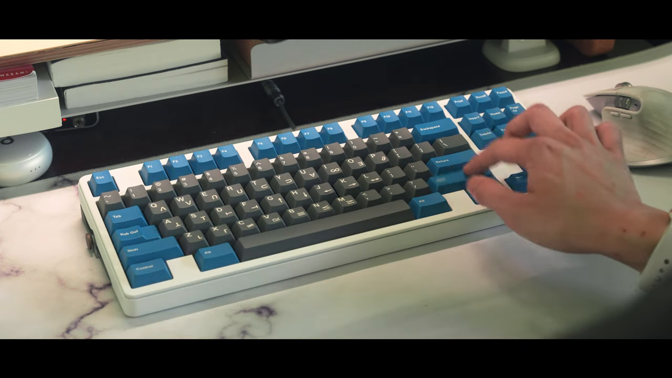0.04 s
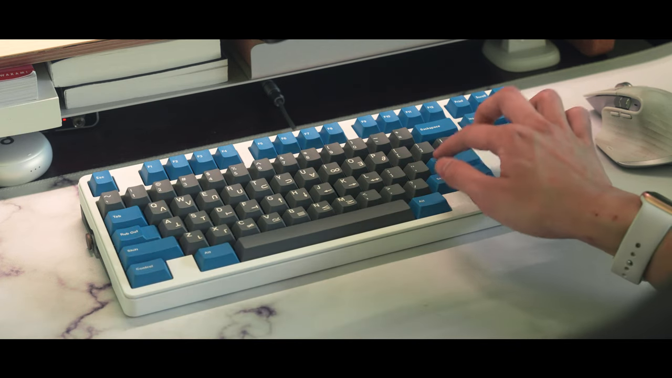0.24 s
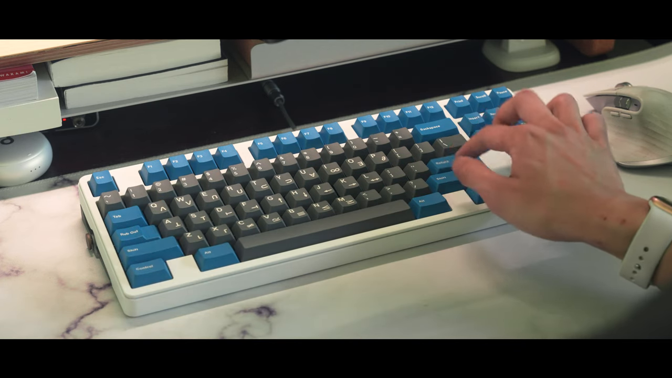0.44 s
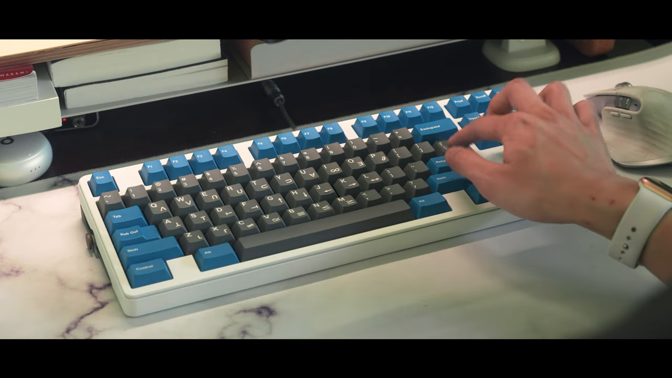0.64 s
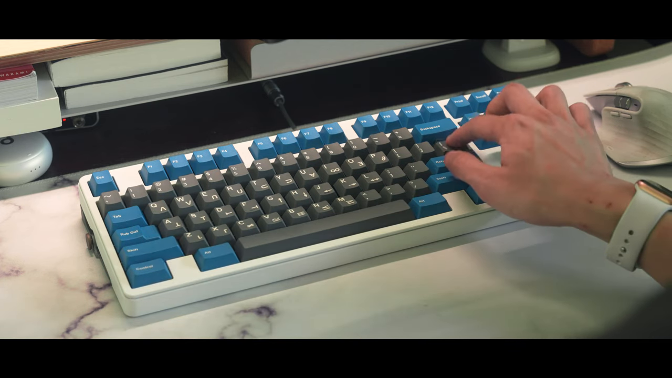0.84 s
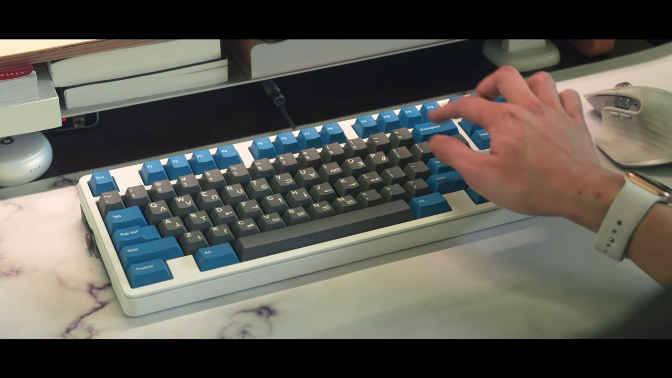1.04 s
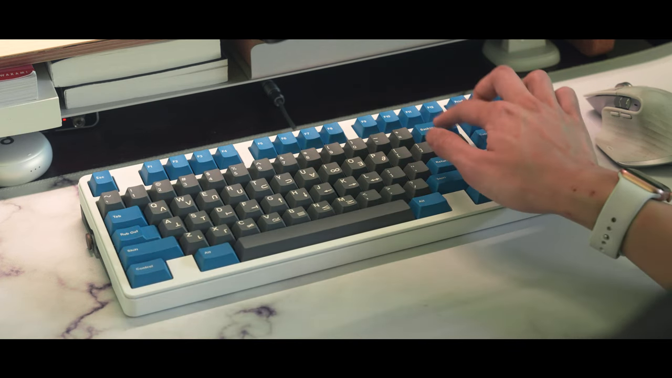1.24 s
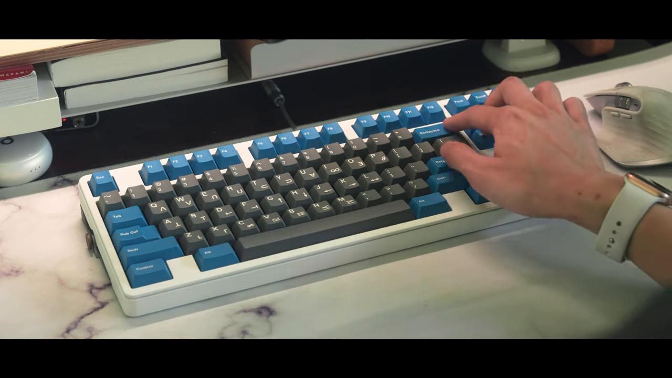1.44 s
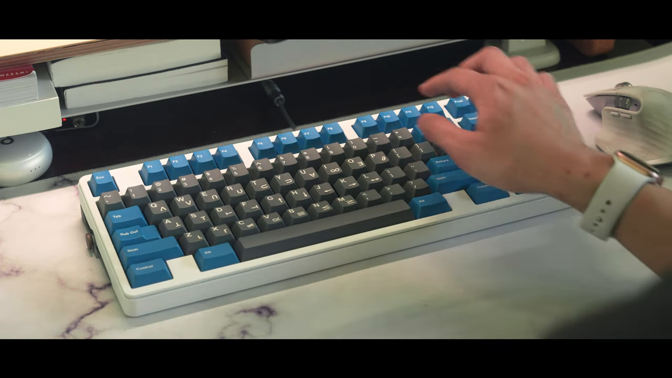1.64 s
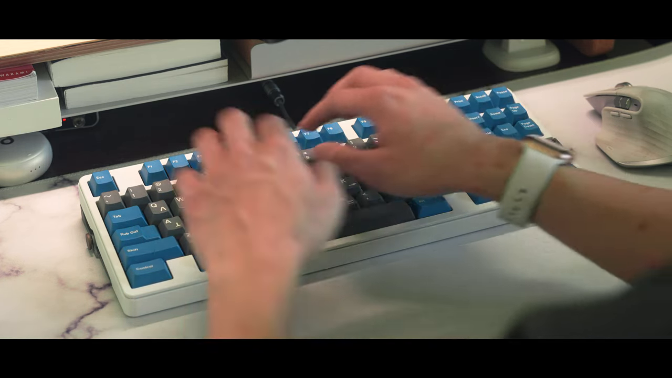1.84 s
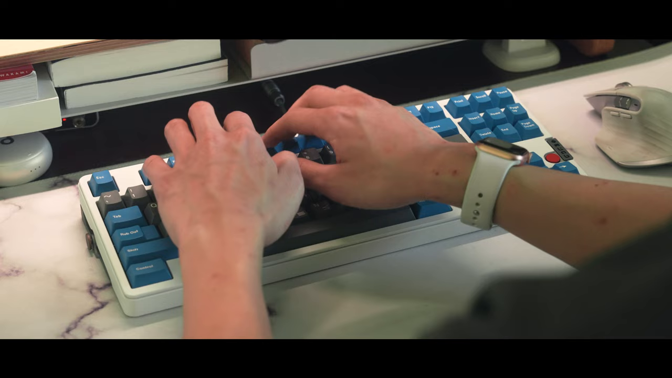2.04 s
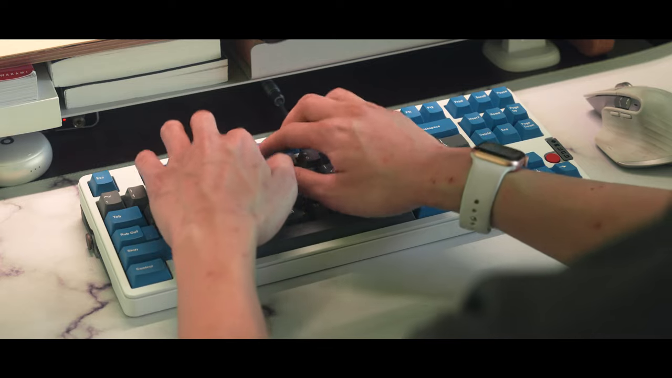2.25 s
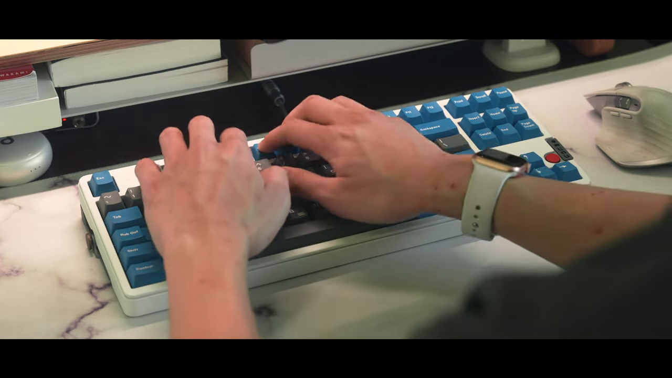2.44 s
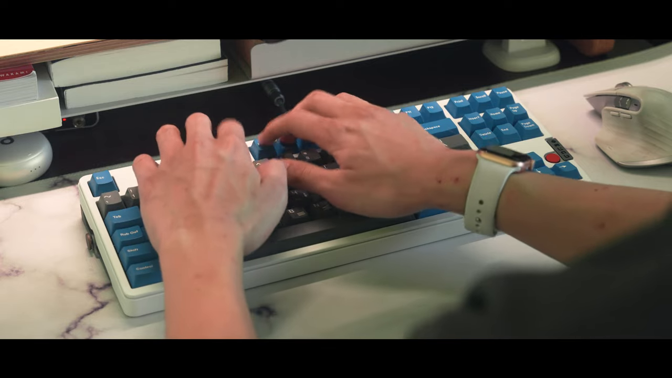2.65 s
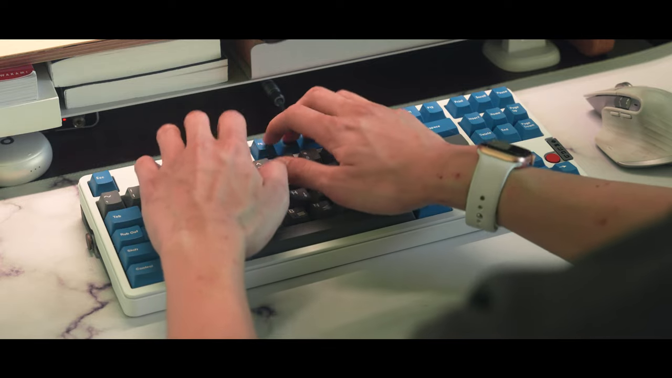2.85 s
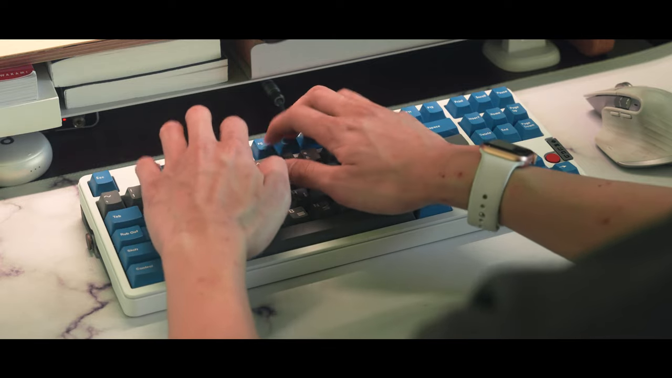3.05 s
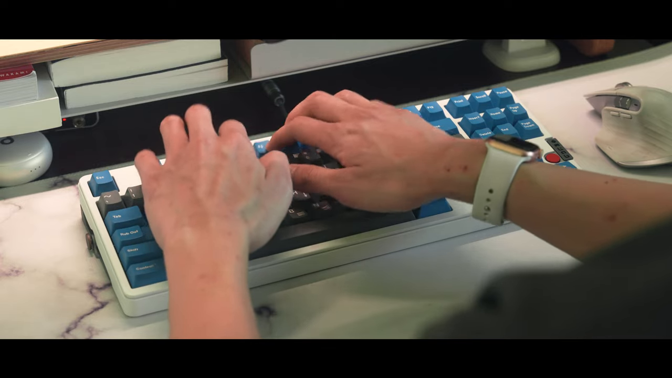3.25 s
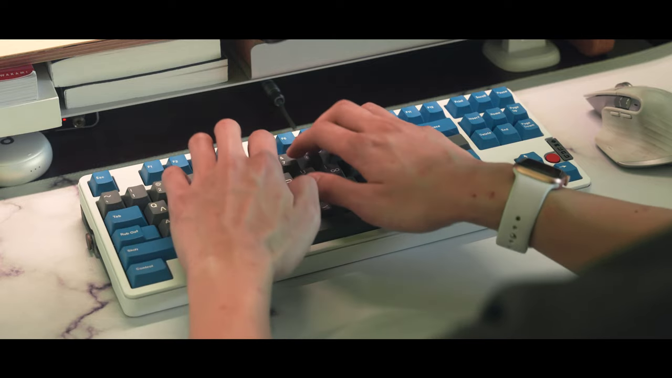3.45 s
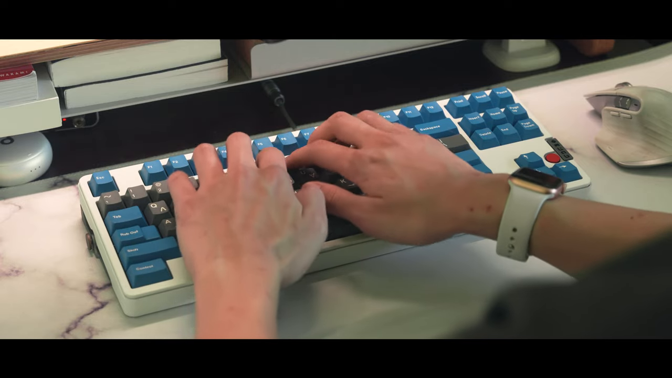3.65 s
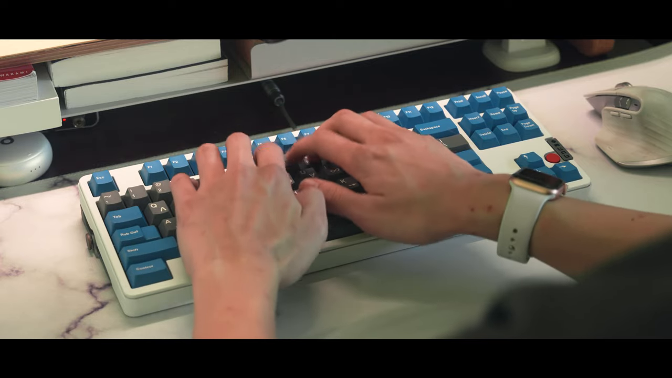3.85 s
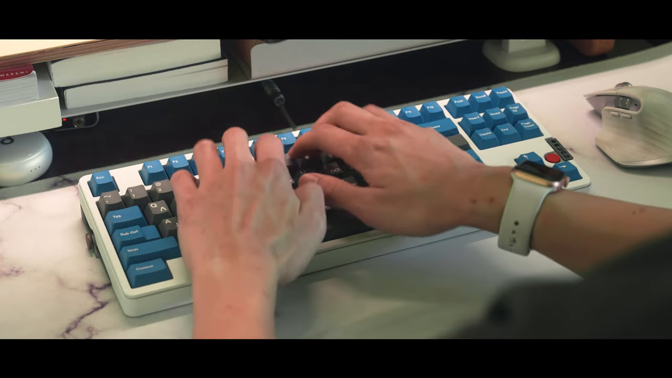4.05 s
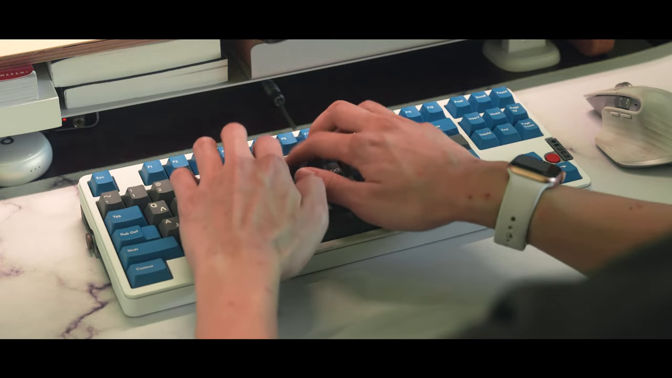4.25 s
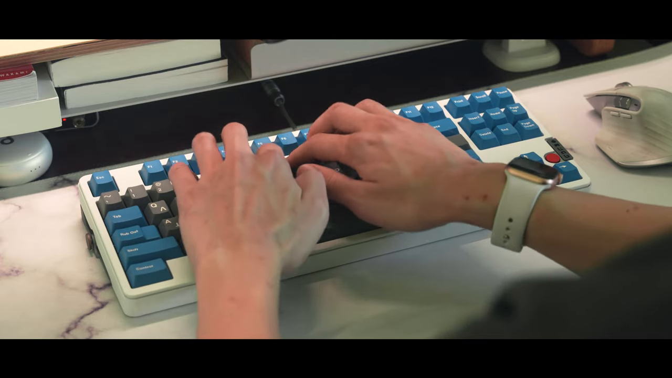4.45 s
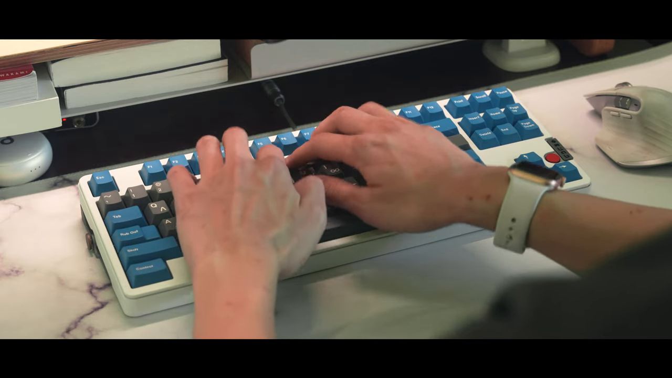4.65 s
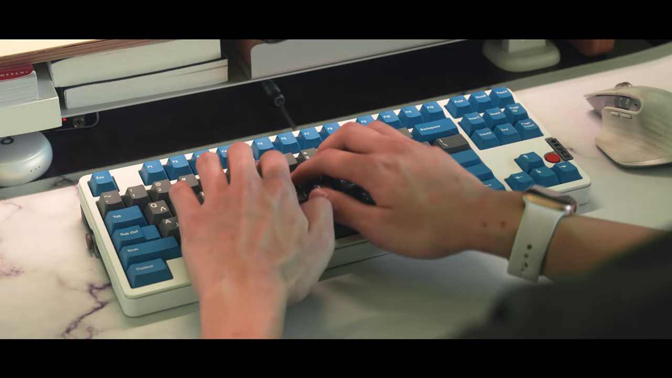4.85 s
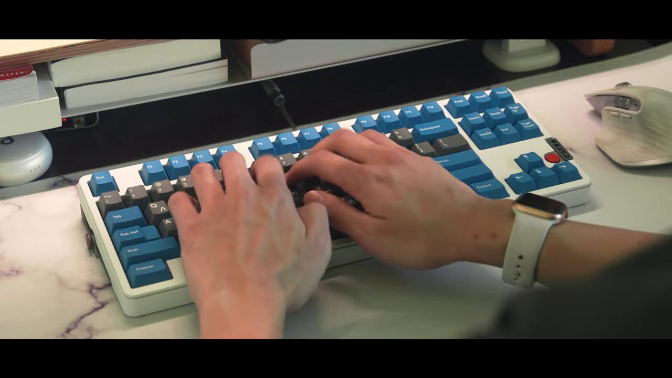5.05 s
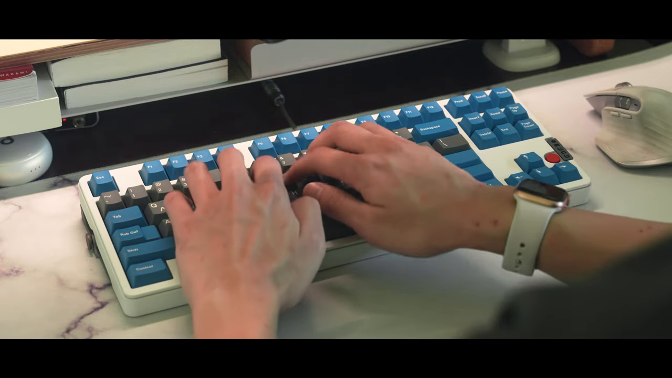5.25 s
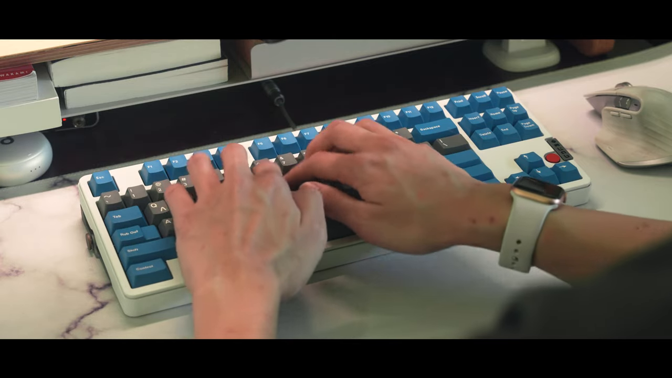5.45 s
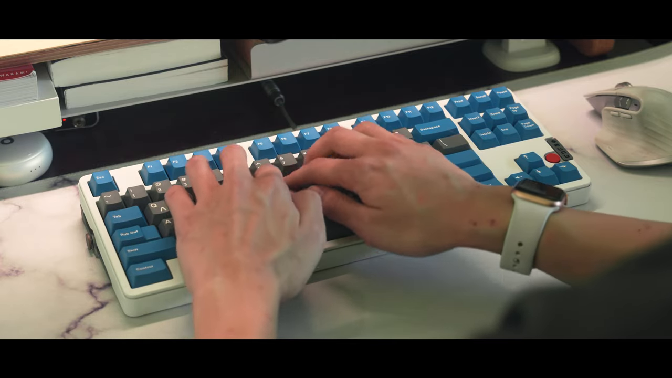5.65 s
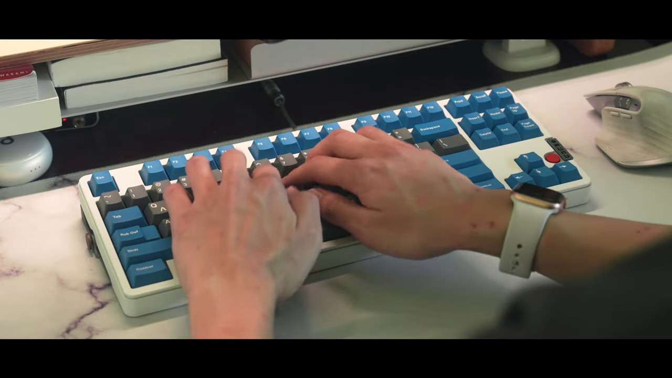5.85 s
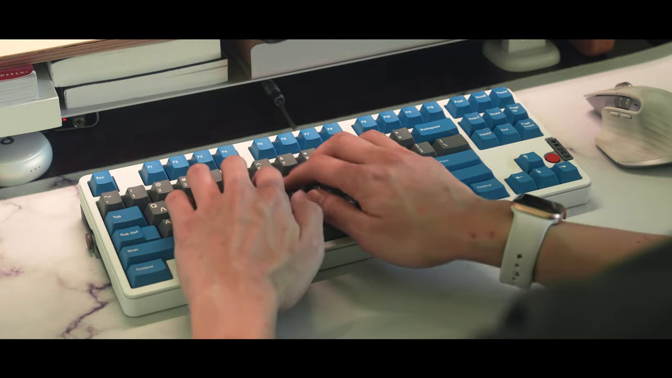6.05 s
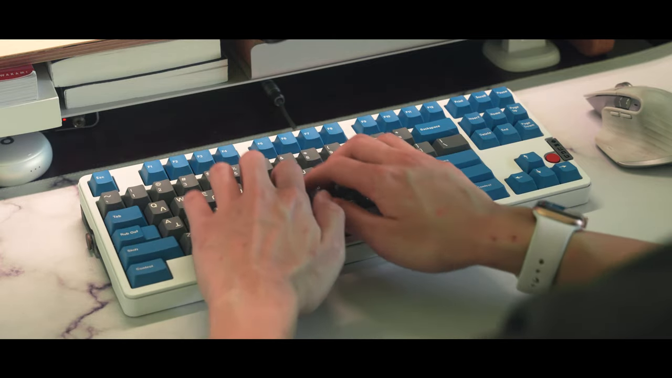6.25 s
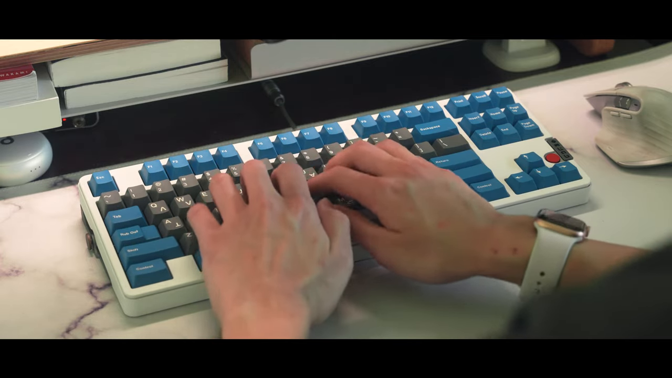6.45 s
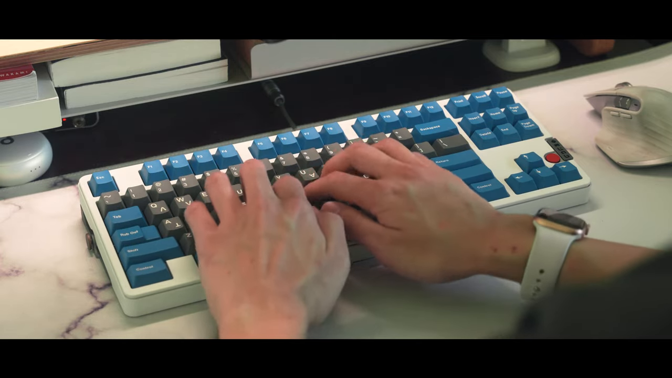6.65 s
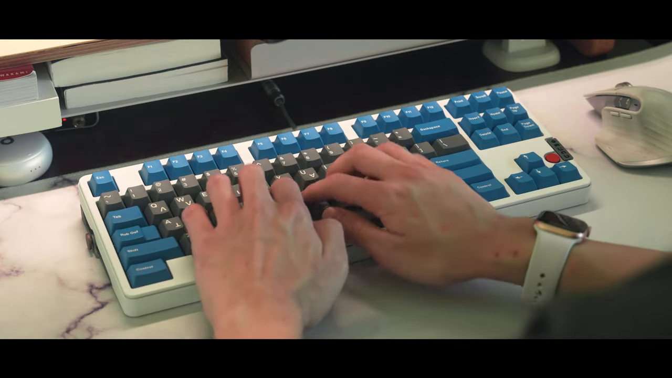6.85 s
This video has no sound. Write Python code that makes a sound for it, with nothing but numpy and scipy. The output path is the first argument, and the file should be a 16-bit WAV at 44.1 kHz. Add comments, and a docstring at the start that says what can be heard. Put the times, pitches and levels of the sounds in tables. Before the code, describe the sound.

A heavy mechanical keyboard on a desk, close to the microphone. First, one hand taps keys singly at a brisk, even pace, each a firm plastic clack with a low thock. After a half-second pause, both hands type four dense, rattling bursts with short gaps between. Light ticks and fingertip brushes fill the bursts. The small room adds only a faint tail over a low, steady hush.

```python
"""A desk in a small room: typing on a heavy mechanical keyboard, close to the microphone.
Single taps on the right-hand keys, then four quick two-handed bursts.
Each stem hitting bottom or springing back rings its keycap, snaps the switch housing and thocks the case.
Stems rub before each blow, fingertips graze caps and light contacts tick between blows.
The room answers faintly with a filtered noise tail, over a steady low hush."""
import sys
import numpy as np
from scipy import signal
from scipy.fft import rfft, irfft, next_fast_len
from scipy.io import wavfile

SR = 44100
rng = np.random.default_rng(int(sys.argv[2]) if len(sys.argv) > 2 else 0)


def file_out(sig):
    """Save sig as 16-bit WAV at sys.argv[1]."""
    # one column per channel
    cols = np.atleast_2d(sig).T
    # limit, then scale
    lim = np.clip(cols, -1, 1)
    pcm = np.round(lim * 32767).astype(np.int16)
    wavfile.write(sys.argv[1], SR, pcm)


N = 304731
SIZE = 8192  # samples per impact
AGE_S = np.arange(SIZE) / SR
FREQS_HZ = np.fft.rfftfreq(SIZE, 1 / SR)


def undb(db):
    """Decibels to gain."""
    return 10 ** (np.asarray(db) / 20)


def unit(x):
    """Scale to an energy of one."""
    return x / np.sqrt(np.sum(x ** 2))


def spectrum(points, size, scale=1):
    """Decibels at each frequency bin, with the points shifted in pitch by scale."""
    hz, db = np.transpose(points)
    bins_hz = np.fft.rfftfreq(size, 1 / SR)
    return np.interp(np.log(bins_hz + 1), np.log(hz * scale), db)


def bump(hz, width_hz):
    """A bell of height one on the frequency axis."""
    return np.exp(-((FREQS_HZ - hz) / width_hz) ** 2)


def resonate(force, db):
    """Pass a short force through a causal, minimum-phase body with the given response."""
    cepstrum = irfft(np.log(undb(db)))
    cepstrum[1:SIZE // 2] *= 2
    cepstrum[SIZE // 2 + 1:] = 0
    return irfft(rfft(force) * np.exp(rfft(cepstrum)))


def add(out, s, x):
    """Mix x in at time s."""
    start = int(np.clip(s * SR, 0, N - 1))
    out[start:start + len(x)] += x[:N - start]


# still air of the room, relative spectrum: freq_hz, level_db (per Hz)
AIR = [(60, -12), (150, -16), (230, -5.5), (300, -11), (440, -15), (600, -22), (1500, -30.5), (2100, -25),
       (2400, -30.5), (3400, -30.5), (4400, -43.5), (6200, -38), (12500, -45.5), (14000, -61)]


def hush(level_db=-71.5):
    """Steady low room noise: white noise shaped by the air spectrum."""
    air = irfft(rfft(rng.standard_normal(N)) * undb(spectrum(AIR, N)), N)
    return undb(level_db) * air / np.std(air)


# colour of each group of keys: start_s, housing_peak_hz, peak_lift_db,
# cap_overtone_hz, overtone_lift_db, antiresonance_hz, notch_depth_db
GROUPS = [(0, 5660, 1, 3890, 9.5, 1465, 6), (.68, 5900, 1, 2986, -1, 1477, 7.5),
          (1.15, 8240, 9.5, 2150, 2.5, 1646, 18.5), (2.0, 7300, -1, 4360, 5.5, 3360, 3.5),
          (3.45, 8350, 3, 2290, 3, 1500, 9), (4.85, 9890, 10, 2990, 4.5, 2190, 1.5)]


def group_at(s):
    """Index of the group of keys under the hands at time s."""
    return max(np.searchsorted(np.array(GROUPS)[:, 0], s) - 1, 0)


def contact(ring_ms, chatter, after, after_s=0.0035):
    """Force of plastic on plastic: one sharp blow, brief chatter, then a weaker shiver of the plate."""
    ring_ms = max(ring_ms, .25)
    chatter_fade = np.exp(-AGE_S * 1000 / (ring_ms * chatter))
    shiver_fade = after * np.exp(-AGE_S / after_s)
    force = unit(rng.standard_normal(SIZE) * (chatter_fade + shiver_fade))
    force[0] += 0.64 / ring_ms  # shorter contacts put more into the first blow
    return force


# plate under each group: narrow_ring_hz, ring_lift_db, struck_case_mode_hz, mode_lift_db
PLATE = [(1870, 5.5, 606, 7.5), (2950, 5.5, 1120, 2.5), (2900, 5, 520, 6), (2040, 4.5, 340, -3),
         (2870, 1.5, 1250, 3.5), (2390, 2, 1250, 1.5)]
# response of a keycap pitched at CAP_HZ: freq_hz, level_db
CAP = [(300, -50.5), (900, -38.5), (1500, -11), (1900, -4.5), (2350, -1.5), (2750, 0.5), (3400, -4.5),
       (4300, -13), (5500, -22), (9000, -41.5)]
CAP_HZ = 2700


def keycap(group, cap_hz, ring_ms):
    """Contact force through the cap response, coloured by overtone, antiresonance and plate ring."""
    _, _, _, overtone_hz, overtone_db, notch_hz, notch_db = GROUPS[group]
    plate_hz, plate_db, _, _ = PLATE[group]
    response_db = spectrum(CAP, SIZE, cap_hz / CAP_HZ)
    response_db = response_db + overtone_db * bump(overtone_hz, 0.13 * overtone_hz)
    response_db = response_db - notch_db * bump(notch_hz, 0.08 * notch_hz)
    response_db = response_db + plate_db * bump(plate_hz, width_hz=95)
    return unit(resonate(contact(ring_ms, chatter=0.75, after=0.44), response_db))


# response of the switch housing: freq_hz, level_db
HOUSING = [(2500, -27), (4400, -5), (5500, -10.5), (6200, 2), (7200, -3.5), (10300, -6.5), (11200, -12.5),
           (13000, -11), (16000, -29.5)]


def housing(group, ring_ms):
    """Bright snap: contact force through the housing, with the group's own peak."""
    _, peak_hz, peak_db, *_ = GROUPS[group]
    response_db = spectrum(HOUSING, SIZE) + peak_db * bump(peak_hz, width_hz=1100)
    return unit(resonate(contact(ring_ms, chatter=0.99, after=0.2), response_db))


# modes of plate and case: freq_hz, level_db, t60_s
CASE = [(194, -26, 0.045), (274, -17, 0.15), (318.6, -10.5, 0.11), (468.5, -10.5, 0.038),
        (545, -13.5, 0.036), (651.4, -14, 0.06), (760, -6.5, 0.03), (860, -9.5, 0.028), (1000, -2.5, 0.023),
        (1134, -6, 0.039), (1232, 0, 0.041), (1411, -3, 0.031)]


def case(group, detune=0.051, scatter_db=4.5, reach=.2, rise_s=0.0011):
    """Decaying modes; the strike position varies per key and alters the high modes most."""
    _, _, struck_hz, lift_db = PLATE[group]
    hz, db, t60_s = np.transpose(CASE)[:, :, None]
    db = db + lift_db * np.exp(-(np.log(hz / struck_hz) / reach) ** 2)
    shift, weight, side = rng.standard_normal((3, len(CASE), 1)) * hz / hz.max()
    tones = np.sin(2 * np.pi * hz * (1 + detune * shift) * AGE_S, dtype=np.float32)
    decays = np.exp(-np.log(1000) / t60_s * AGE_S, dtype=np.float32)
    gains = np.sign(side) * undb(db + scatter_db * weight)
    thock = np.sum(gains * tones * decays, axis=0)
    return unit(thock * (1 - np.exp(-AGE_S / rise_s)))


def key(s, cap_hz, snap_db, thock_db, ring_ms):
    """One impact: keycap ring, housing snap and case thock, levels relative to the cap."""
    group = group_at(s)
    cap = keycap(group, cap_hz, ring_ms)
    snap = undb(snap_db) * housing(group, ring_ms)
    thock = undb(thock_db) * case(group)
    return cap + snap + thock


# stems hitting bottom or top, and fingers landing in the pauses:
# time_s, energy_db, cap_pitch_hz, snap_db (relative to cap)
STROKES = [(0.0126, -25, 3400, 6.0), (0.0409, -7, 2320, -10.0), (0.1229, -2.0, 2060, -10.5),
           (0.2122, -15.5, 2560, -13), (0.2215, -3, 1930, -9.0), (0.2973, -10, 2070, -28),
           (0.3518, -30.0, 2820, -13), (0.3732, -6.5, 1920, -8.5), (0.4487, -14, 2010, -18),
           (0.5318, -3.5, 2020, -16), (0.6091, -14.5, 2650, 1.5), (0.702, -25, 3200, -6.5),
           (0.7157, -3.5, 2480, -11), (0.7948, -7.5, 2340.0, -9), (0.8374, -26.5, 2670, -14.0),
           (0.8643, -8.5, 2560, -13), (0.9356, -16.5, 2610.0, -4), (0.9812, -26.5, 3380, -8),
           (1.0071, -8, 2520, -13.5), (1.0702, -5.5, 2450.0, -7.5), (1.1739, -19.5, 2940, -11.0),
           (1.1872, -4.5, 2450, -16.0), (1.2531, -13, 2380, -12.5), (1.3134, -21, 3220, -1),
           (1.341, -1.5, 2560, -13.5), (1.413, -9.5, 2800, -10.0), (1.4666, -23.5, 3380, -0.5),
           (1.4932, -1.5, 2580.0, -11.5), (1.578, -14, 2860.0, -11.5), (2.1307, -26.5, 3220, -7),
           (2.1768, -12, 2500, -9.5), (2.2084, -13.5, 2700, -16), (2.2136, -16.5, 3080, -3),
           (2.2366, -16.5, 2590, -15), (2.273, -5, 3660, -16), (2.295, -19.5, 2590, 1.5),
           (2.4083, -18.5, 3130, -4.5), (2.4438, -8, 2500, -11), (2.4643, -11, 2450.0, -10.5),
           (2.5068, -8.5, 3030, -8.5), (2.6267, -18, 2930, -1), (2.6405, -17, 3020, -9),
           (2.6866, -11, 2800, -15), (2.692, -12, 2480, -16.0), (2.7087, -16, 2820, -13),
           (2.7128, -11.5, 2570.0, -10), (2.7332, -15.5, 2570, -9.5), (2.7554, -11.5, 3070, -10.0),
           (2.799, -20.5, 2750, -2), (2.8475, -18.5, 2640, -4.5), (2.871, -16.5, 3400, -16),
           (2.9087, -8, 2520, -13.5), (2.9256, -13.0, 2597, -11.5), (2.93, -12.5, 2600, -14),
           (2.9634, -19.5, 2680.0, -7), (2.9887, -16.5, 2950, -23), (3.0987, -12, 3500, -4),
           (3.1216, -11.5, 2180, -11), (3.1264, -12, 2730, -11.0), (3.168, -7.5, 2710, -11.0),
           (3.2183, -10, 2960, -8), (3.3059, -17.5, 3000.0, -2), (3.33, -17, 3625, -2.5),
           (3.4826, -50, 2960, -6), (3.5499, -30.5, 3330, -10.5), (3.5797, -39, 3100, -22),
           (3.6218, -11, 2580, -10), (3.635, -13, 2730, -18), (3.6528, -9.5, 2750.0, -9.5),
           (3.664, -11.5, 3127, -12), (3.6983, -9.5, 2760, -9), (3.703, -8.5, 2898, -11),
           (3.7523, -16, 2730, -7.5), (3.82, -13.5, 2800, -8.5), (3.8623, -8.5, 2740, -14),
           (3.8824, -5.5, 2550, -11.0), (3.9075, -5.5, 2840, -15), (3.9538, -8, 2670, -10.0),
           (3.994, -16.5, 2597, -10.5), (4.0329, -17.5, 2580.0, -5.5), (4.0516, -18.0, 3020, -10),
           (4.0806, -17.5, 2790, -10.5), (4.1138, -11, 2580, -20), (4.1238, -4, 2790, -12.0),
           (4.1361, -7, 2730, -13), (4.1565, -13.5, 2710.0, -11.5), (4.1816, -14, 2600, -10.5),
           (4.2089, -8.0, 2941, -8), (4.2833, -20, 3080, 1), (4.3308, -13, 2500, -9.0),
           (4.3421, -7.5, 2735, -14), (4.354, -5.5, 2553, -11), (4.3722, -9.5, 2703, -17),
           (4.3789, -16, 2730, -11.0), (4.4437, -6, 2740, -10.5), (4.4646, -14, 2650, -12.5),
           (4.5685, -8.5, 2913, -10), (4.5831, -4, 2688, -15), (4.5922, -4.5, 3030, -12.5),
           (4.616, -12, 2590, -11.0), (4.6543, -10.5, 2760, -9), (4.6574, -4.5, 2760, -9.5),
           (4.6983, -18, 2650, -6), (4.7443, -17, 2540.0, -9), (4.7568, -17, 3000, -5),
           (4.7742, -15, 2950.0, -7), (4.8688, -35.5, 3040, -4), (4.9112, -37.5, 3370.0, -10),
           (5.0084, -30.5, 2780, -12), (5.0565, -26.5, 3250, -7.5), (5.0944, -14.5, 2733, -13),
           (5.112, -2.5, 2550, -11), (5.1295, -5, 2630, -7.0), (5.1569, -8.0, 2660.0, -7.5),
           (5.1772, -12.5, 2985, -9), (5.2328, -18.0, 2770.0, -15), (5.2772, -22, 3300, 1.0),
           (5.311, -12.5, 2950, -4.5), (5.3186, -15.5, 2770.0, -13), (5.3279, -9, 2750, -11),
           (5.3459, -7.5, 2646, -7), (5.3638, -11, 2650, -12), (5.3729, -9.5, 2760, -8),
           (5.4011, -10, 2760.0, -9), (5.415, -6, 2950, -4.5), (5.446, -13.5, 2450, -16),
           (5.5255, -18.5, 2960, -1.5), (5.5362, -17.5, 2744, -2), (5.539, -16, 2870, -19),
           (5.5736, -10.5, 2710.0, -17.0), (5.5844, -8, 2610, -12), (5.5882, -9, 2578, -6.5),
           (5.6095, -8.0, 2720, -7.0), (5.6398, -8, 2820, -9), (5.6553, -6.5, 3000.0, -4.5),
           (5.6753, -16, 2900, -10), (5.7454, -7.5, 2450, -2.5), (5.777, -14.5, 3010.0, -2.5),
           (5.7923, -8, 2820, -9.5), (5.8072, -7.5, 2600, -7.5), (5.8237, -9, 2650, -13),
           (5.8394, -9.0, 2940, -6.5), (5.866, -14.5, 2897, -9), (5.9046, -5.5, 3060, -5.5),
           (5.9267, -16, 2680, -6.0), (5.937, -19, 2700, -10), (5.989, -15.5, 3366, 0.5),
           (6.024, -13, 2716, -5.5), (6.0281, -13.0, 2720, -15.0), (6.0311, -10, 2750, -9),
           (6.0392, -8, 2660.0, -7.0), (6.0452, -6, 2480, -12.5), (6.0776, -14, 2800, -11),
           (6.1172, -12, 2740, -4.5), (6.126, -9.5, 2960, -6), (6.143, -12.5, 2580, -7),
           (6.2198, -15, 2863, -6), (6.2294, -15.5, 2620, -10), (6.34, -42.5, 2860, -18),
           (6.363, -47.5, 2960.0, -9.5), (6.478, -44.5, 2870, -14), (6.5156, -36.0, 3025, -15),
           (6.5357, -12.5, 2740, -13), (6.5583, -7.5, 2800, -15), (6.5623, -6.5, 2750, -12),
           (6.5723, -7.5, 2618, -4.5), (6.6103, -9.5, 2760, -8.5), (6.6583, -9, 2780.0, -2.5),
           (6.687, -15.5, 3123, -5), (6.7393, -17.5, 3080, -8.5), (6.7648, -9, 2860, -13),
           (6.7695, -9, 2820, -4.0), (6.7772, -14, 2815, -8), (6.7972, -9.5, 2700, -10),
           (6.8116, -6.5, 2760, -11.0), (6.865, -8.5, 2980.0, -5.5), (6.8867, -13.5, 2810, -8.5)]


def slides(slide_db=-30, lead_s=0.01):
    """The stem rubs softly down its housing just before each blow: a faint, long contact."""
    out = np.zeros(N)
    lead_shares = rng.uniform(0.62, 1.5, len(STROKES))
    for (s, db, cap_hz, _), share in zip(STROKES, lead_shares):
        rub = key(s, cap_hz, snap_db=-5, thock_db=-15.0, ring_ms=9)
        add(out, s - lead_s * share, undb(db + slide_db) * rub)
    return out


# answer of each group to a normal blow: thock_db, thock_slope_db_per_db (of force),
# ring_ms, ring_shortening_per_db (of force, exponential), rebound_db
TOUCH = [(-13, -0.24, 2, 0.14, -25), (-13, -0.3, 1.9, 0.17, -23.5), (-13, -0.21, 1.3, 0.17, -26.5),
         (-16.5, -.5, 1.06, 0.18, -11.5), (-18.5, -0.69, 0.83, 0.17, -11.5),
         (-22.5, -0.73, 0.63, 0.1755, -11.5)]
NORMAL_DB = -10  # force is counted from this energy
FORCE_FLOOR_DB = -10.5  # below this force the balance of thock stays the same
REBOUND_S, REBOUND_SPREAD = .0018, .3  # median lag, log spread


def stroke(s, db, cap_hz, snap_db):
    """Blow and rocking-cap rebound; harder blows seat the cap sooner, the cushioned case takes less."""
    thock_db, thock_slope, ring_ms, shortening, rebound_db = TOUCH[group_at(s)]
    force_db = max(db - NORMAL_DB, FORCE_FLOOR_DB)
    ring_ms *= np.exp(-shortening * max(force_db, -3))
    blow = key(s, cap_hz, snap_db, thock_db + thock_slope * force_db, ring_ms)
    lag = int(SR * REBOUND_S * np.exp(REBOUND_SPREAD * rng.standard_normal()))
    rebound = undb(rebound_db) * np.pad(blow, (lag, 0))[:SIZE]
    return undb(db) * (blow + rebound)


def keystrokes():
    """The listed blows, each with its rebound."""
    out = np.zeros(N)
    for row in STROKES:
        add(out, row[0], stroke(*row))
    return out


# colour of the lingering sound of springs and room: freq_hz, level_db
ROOM = [(200, 0), (330, 9), (600, 2.5), (1300, -1.5), (2100, -2), (2900, -3.5), (3700, -0.5), (5000, -1),
        (6150, 2.5), (7500, -5.5), (14000, -4)]


def room(x, wet_db=-18, t60_s=0.42, delay_s=0.0055, grain=0.86):
    """Faint tail: separate early reflections that thicken as they fade."""
    t = np.arange(2 * SIZE) / SR
    noise, strength = rng.standard_normal((2, len(t)))
    sparseness = np.exp(grain * np.clip(strength, -2, 2) * np.exp(-t / 0.075))
    decay = np.exp(-np.log(1000) * t / t60_s)
    onset = np.clip(t / delay_s - 1, 0, 1)
    wet = signal.fftconvolve(x, unit(noise * sparseness * decay * onset))
    size = next_fast_len(len(wet))
    return undb(wet_db) * irfft(rfft(wet, size) * undb(spectrum(ROOM, size)), size)[:N]


LIGHT_HZ = 2845  # cap pitch of grazes, median cap pitch of ticks
# spells of two-handed typing: start_s, end_s
BURSTS = [(2.14, 3.33), (3.59, 4.78), (5.06, 6.24), (6.5, 6.9)]


def grazes(rate_hz=20, graze_db=-39, spread_db=3.5):
    """Fingertips brush neighbouring caps at random times while the hands are busy."""
    out = np.zeros(N)
    for start_s, end_s in BURSTS:
        for s in rng.uniform(start_s, end_s, int(rate_hz * (end_s - start_s))):
            gain = undb(graze_db + spread_db * rng.standard_normal())
            add(out, s, gain * key(s, LIGHT_HZ, snap_db=4.5, thock_db=6.5, ring_ms=2.0))
    return out


TICK_DB, TICK_SPREAD_DB, TICK_PITCH_SPREAD = -24, 2, 0.14  # pitch spread is logarithmic
TRAVEL_S = .016  # near-silent finger travel before the next key lands


def ticks(rate_hz=66, looseness=0.41, snap_db=-6):
    """Fingers landing and caps rocking: light strokes loosely spaced between successive burst blows."""
    out = np.zeros(N)
    blows_s = np.array(STROKES)[:, 0]
    for start_s, end_s in BURSTS:
        edges_s = blows_s[(blows_s > start_s) & (blows_s < end_s)]
        for before_s, after_s in zip(edges_s, edges_s[1:]):
            gap_s = after_s - before_s - TRAVEL_S
            steps = max(int(gap_s * rate_hz), 0)
            for k, (early, force, size) in enumerate(rng.standard_normal((steps, 3)), 1):
                s = before_s + gap_s * (k - looseness * (1 + np.tanh(early))) / steps
                db = TICK_DB + TICK_SPREAD_DB * force
                cap_hz = LIGHT_HZ * np.exp(TICK_PITCH_SPREAD * size)
                add(out, s, stroke(s, db, cap_hz, snap_db))
    return out


def scene():
    """The keyboard in its room."""
    keys = slides() + keystrokes() + grazes() + ticks()
    return (hush() + keys + room(keys))[None]


def record(dry, leak_db=-26, low_cut_hz=166.4, top_hz=16300):
    """A steep low cut lets only a trace of desk rumble through; the top is cut as well."""
    low_cut = signal.butter(12, low_cut_hz, "high", fs=SR, output="sos")
    thin = signal.sosfilt(low_cut, dry) + undb(leak_db) * dry
    top_cut = signal.ellip(8, .2, 70, top_hz, fs=SR, output="sos")
    return signal.sosfilt(top_cut, thin)


dry = scene()
out = record(dry)
file_out(out)
```